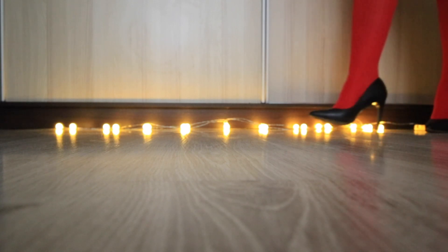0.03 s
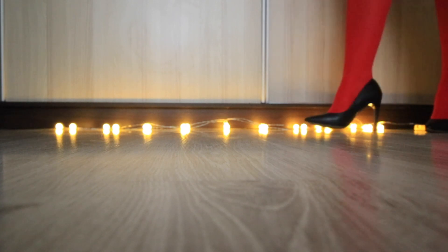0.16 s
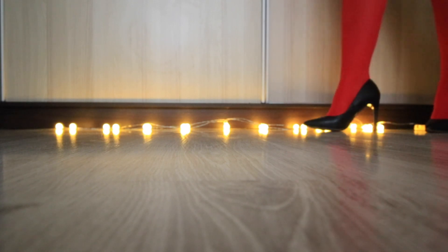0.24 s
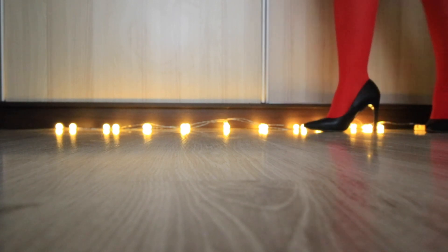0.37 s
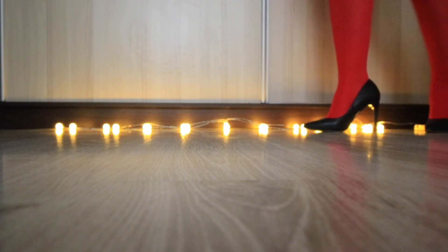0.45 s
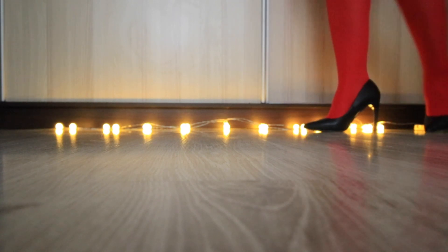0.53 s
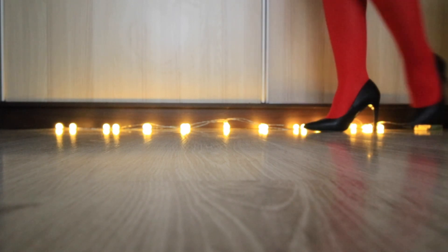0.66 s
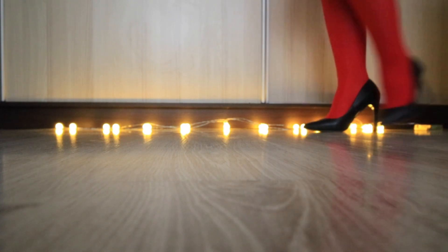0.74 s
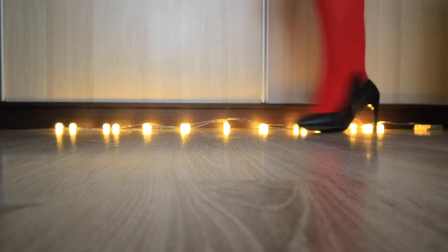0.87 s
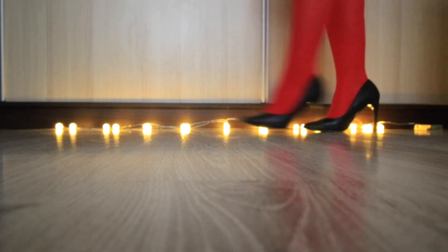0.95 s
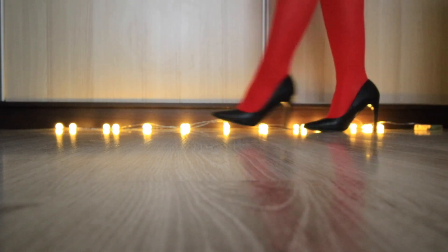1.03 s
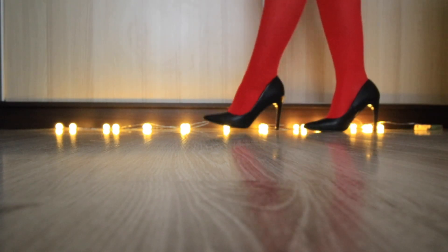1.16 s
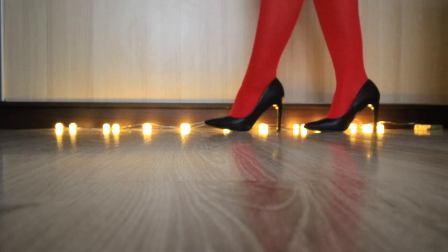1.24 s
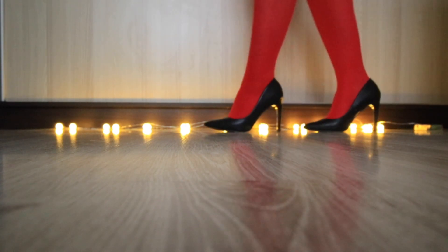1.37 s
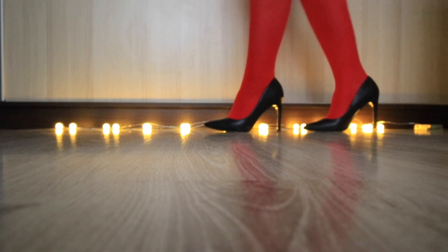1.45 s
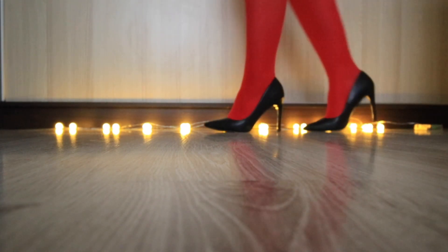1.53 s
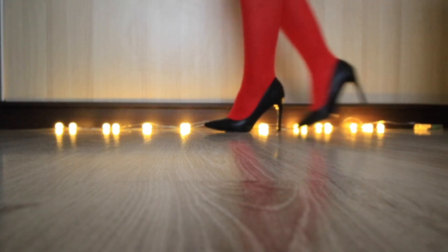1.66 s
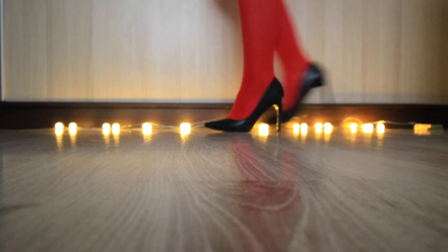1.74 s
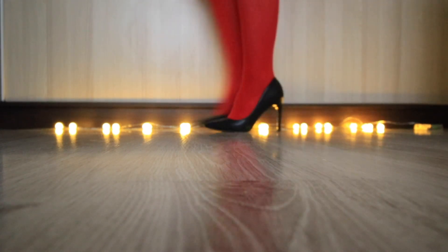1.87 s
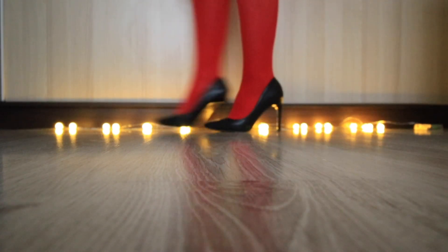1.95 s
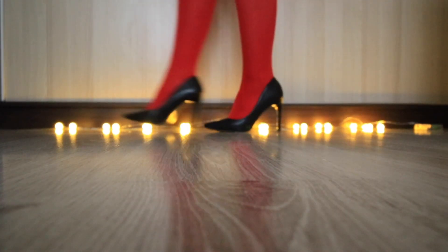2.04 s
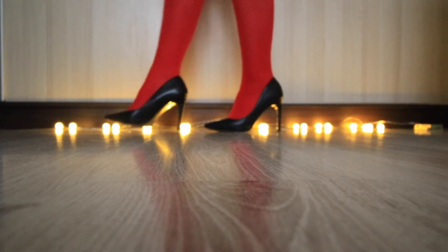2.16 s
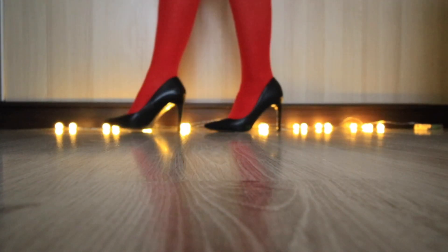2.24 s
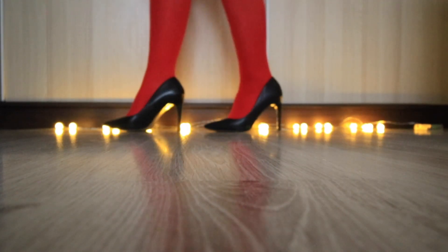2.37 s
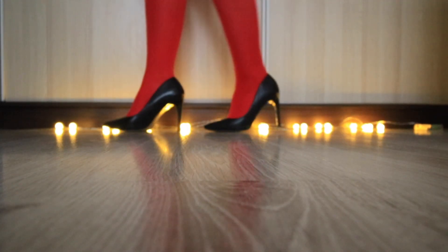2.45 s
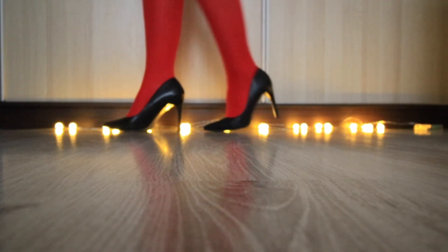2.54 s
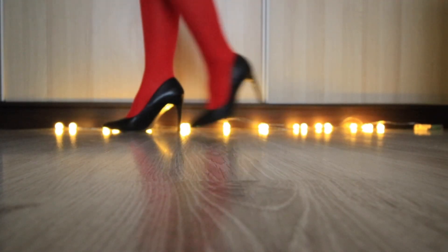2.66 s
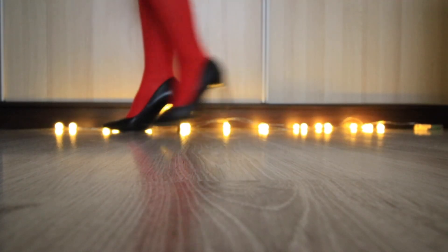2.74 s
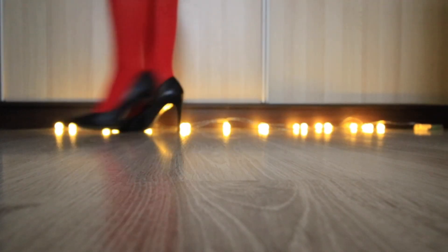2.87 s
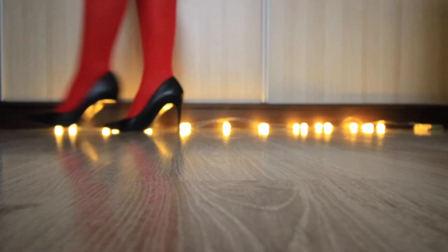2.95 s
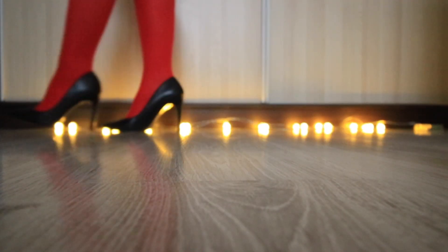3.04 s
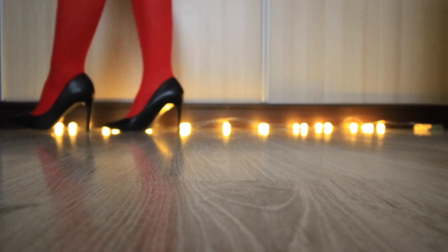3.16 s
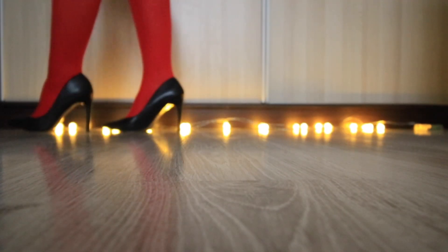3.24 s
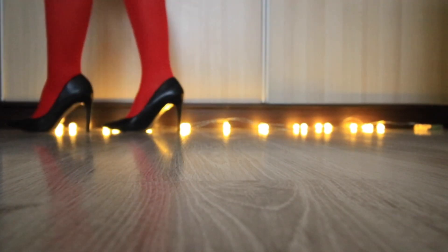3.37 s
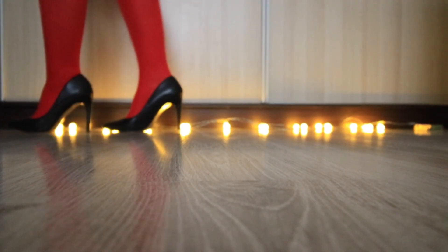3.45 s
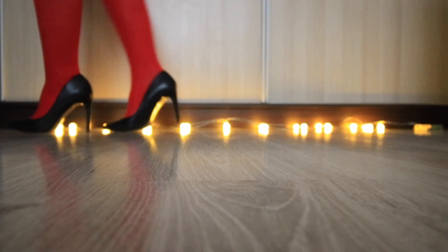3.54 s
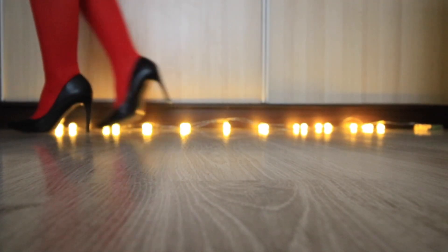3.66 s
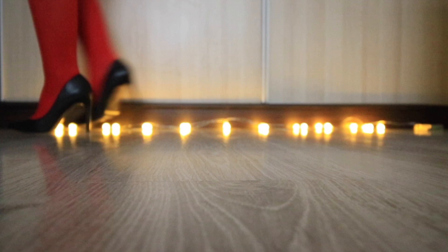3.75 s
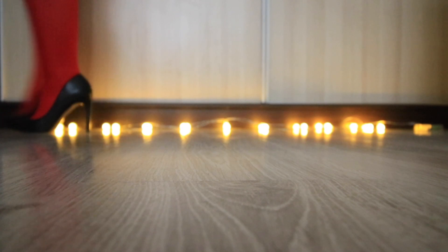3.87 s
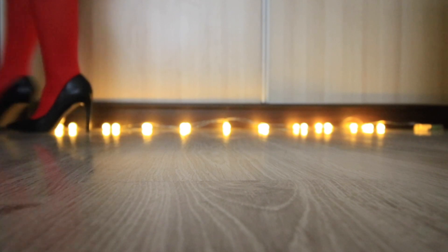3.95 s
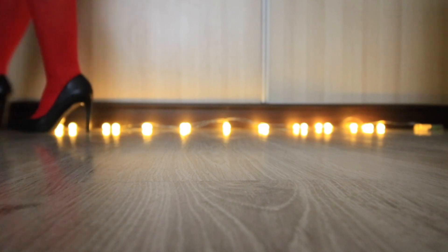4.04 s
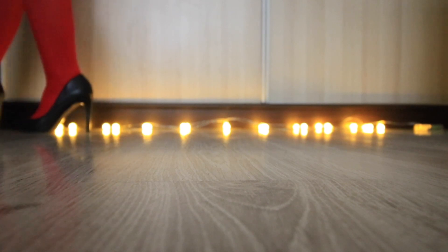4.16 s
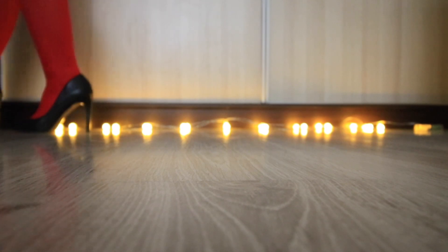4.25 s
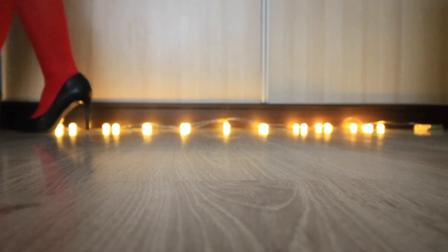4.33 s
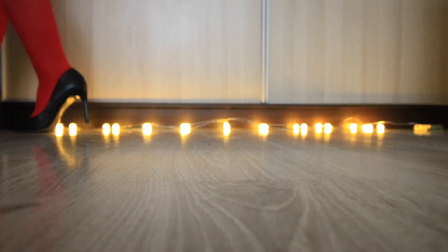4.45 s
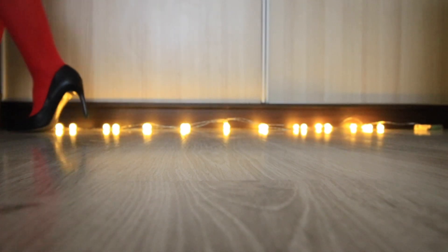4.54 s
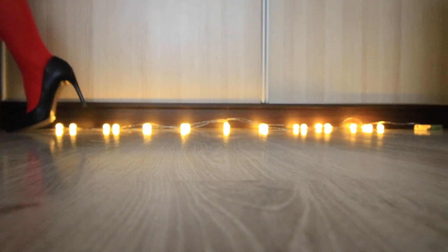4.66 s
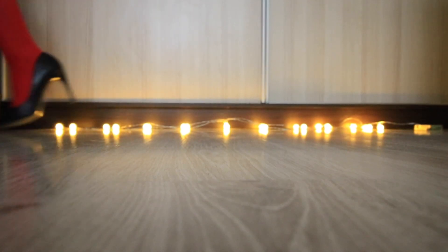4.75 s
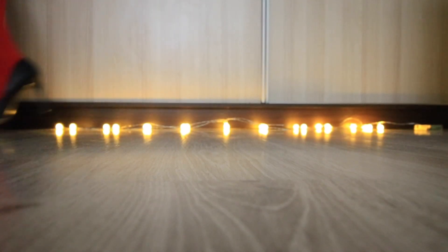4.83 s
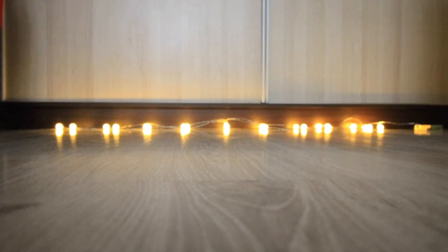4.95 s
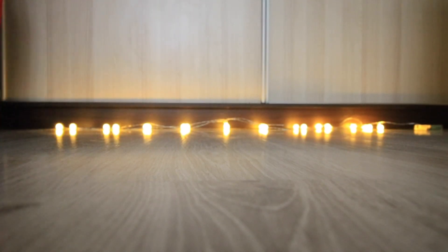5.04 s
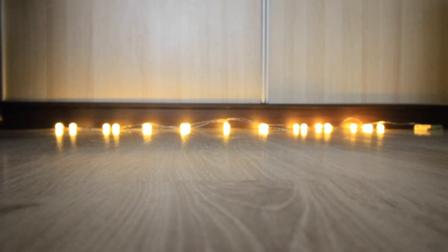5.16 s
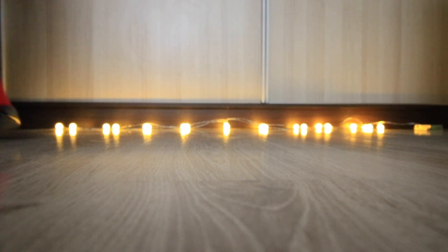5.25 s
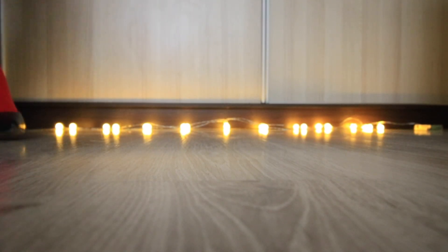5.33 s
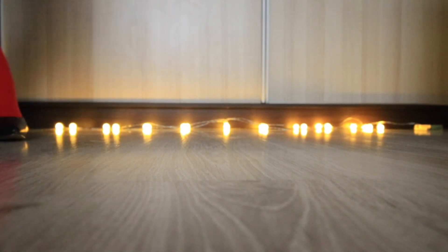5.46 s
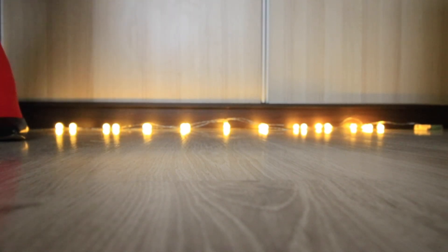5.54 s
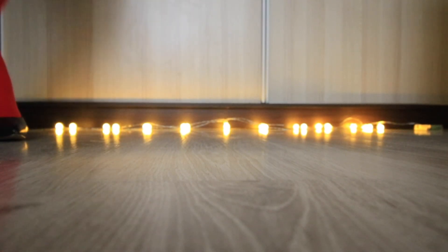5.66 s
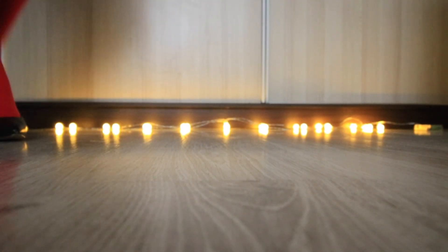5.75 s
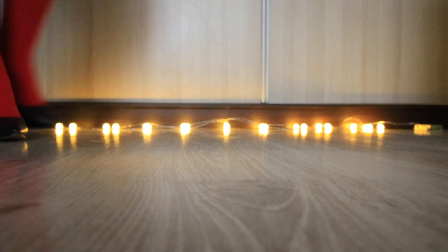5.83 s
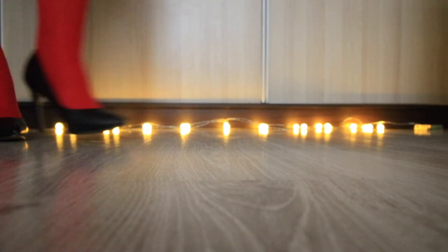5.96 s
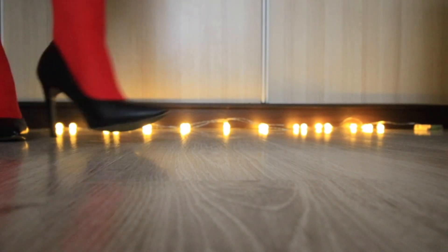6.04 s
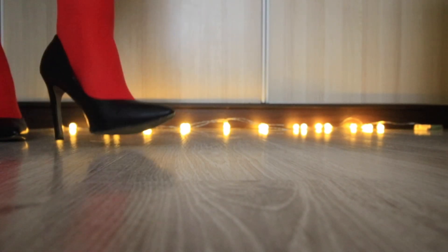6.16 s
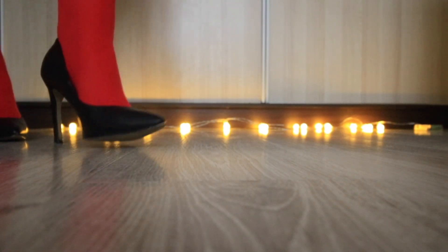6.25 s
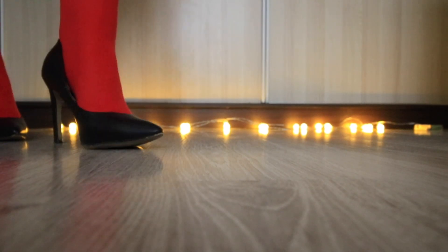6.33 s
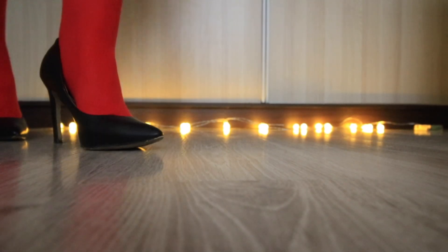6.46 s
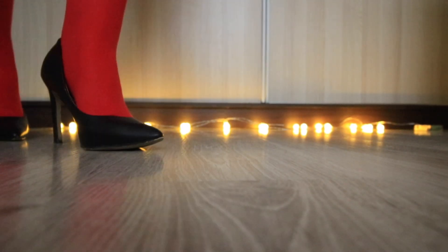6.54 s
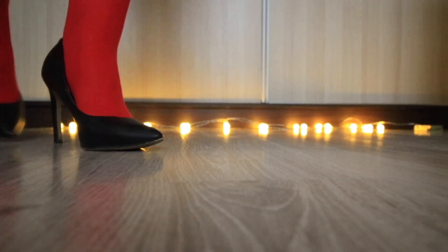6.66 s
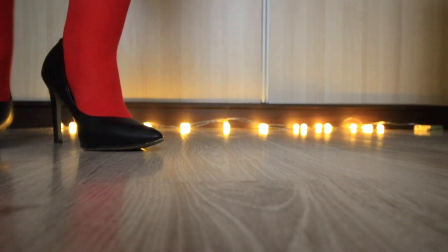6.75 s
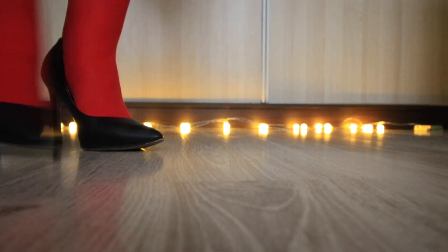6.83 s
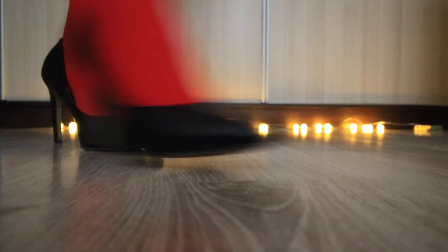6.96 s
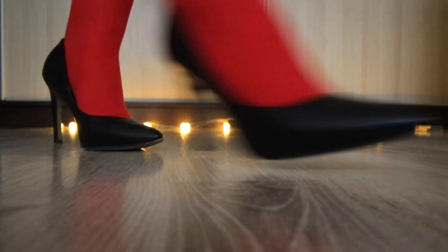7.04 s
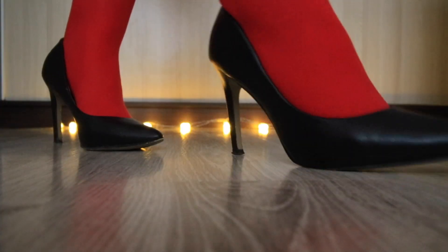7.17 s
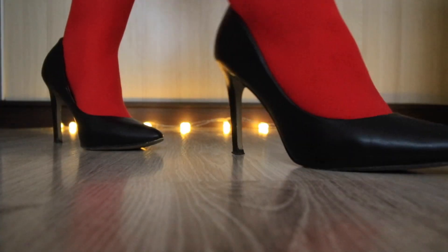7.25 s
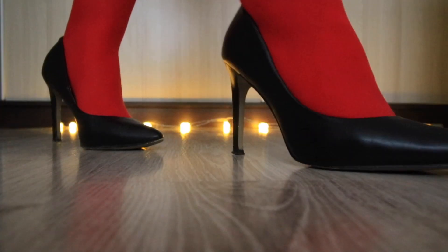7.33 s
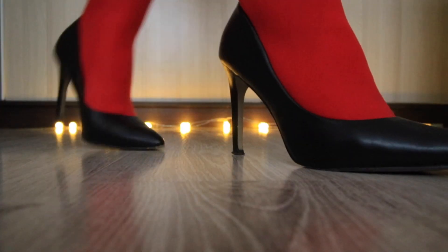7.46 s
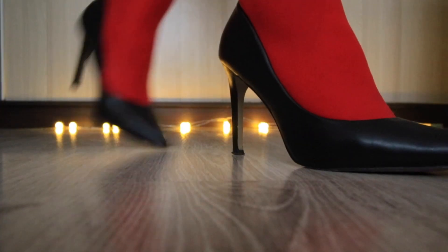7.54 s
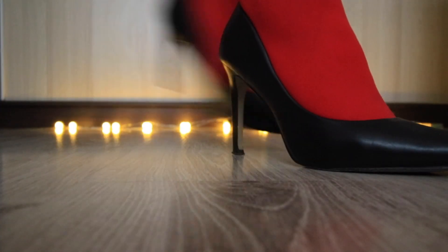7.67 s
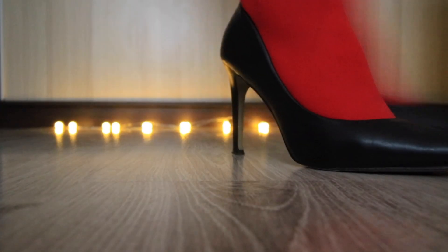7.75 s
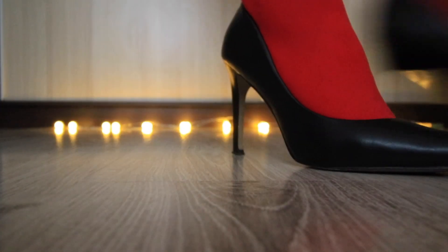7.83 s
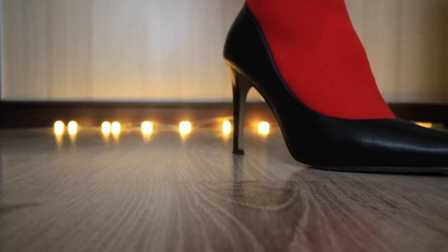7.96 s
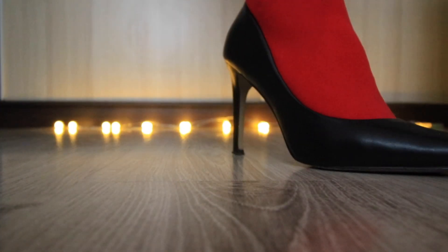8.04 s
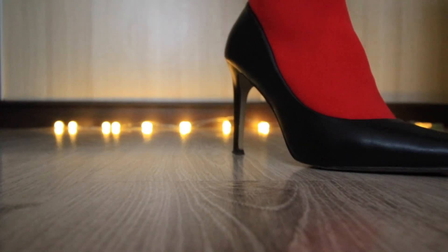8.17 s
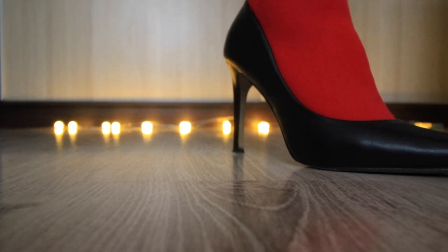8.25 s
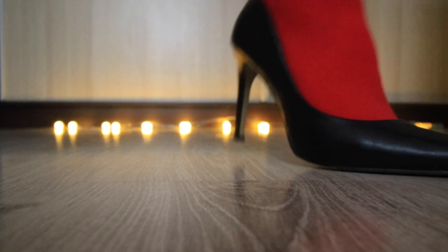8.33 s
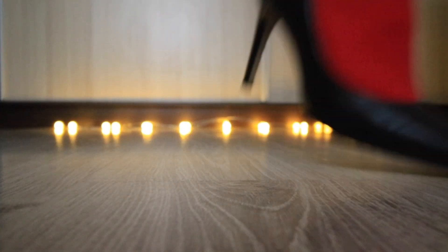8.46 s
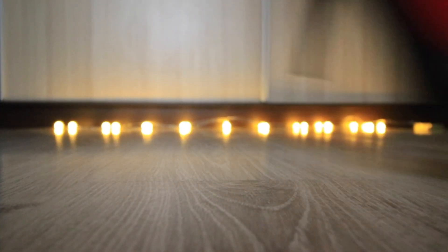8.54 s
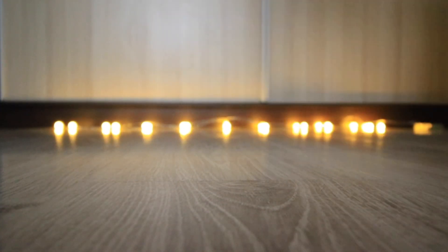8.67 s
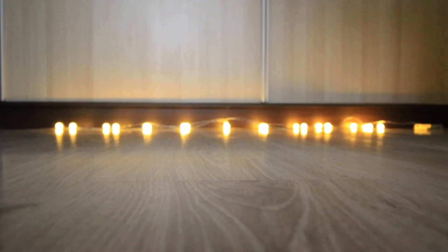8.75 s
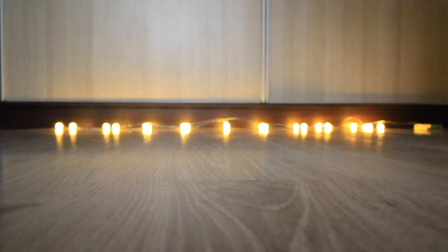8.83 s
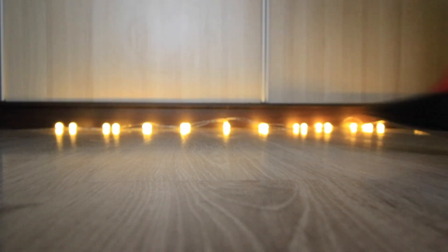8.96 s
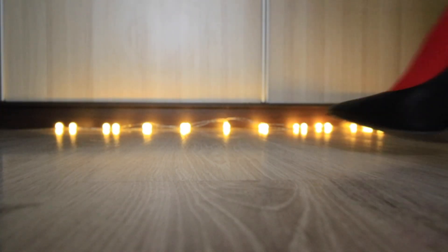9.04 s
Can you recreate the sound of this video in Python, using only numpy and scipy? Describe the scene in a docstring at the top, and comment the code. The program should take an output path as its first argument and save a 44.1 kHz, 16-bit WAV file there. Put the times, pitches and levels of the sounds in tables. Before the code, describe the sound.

Nine evenly spaced high-heel steps on a hard wooden-type floor, indoors. Each crisp heel strike has a short woody ring and thud, followed by a faint sole pat. Sharp clicks of shifting weight cluster around the middle, with airy stocking rustle as the legs pass. Short room echo surrounds early steps; the last three are nearer, fuller and more direct, over a low quiet room noise.

```python
"""Slow steps in stiletto heels on a laminate floor in a small room, ending close to the microphone.
Each heel knocks the boards (harder blows are brighter, nearer ones drier), the sole taps after it, and shoe and planks snap under the shifting weight.
Between steps the stockinged legs brush past each other, over a quiet room noise."""
import sys
import numpy as np
from scipy import signal
from scipy.fft import rfft, irfft, next_fast_len
from scipy.io import wavfile
from scipy.ndimage import uniform_filter1d, map_coordinates

SR = 44100
rng = np.random.default_rng(int(sys.argv[2]) if len(sys.argv) > 2 else 0)


def digitize_waveform(pressure):
    """Quantize a signal to 16-bit integers and store it at the path in sys.argv[1].

    Rows of a 2-D input are taken as channels; values are limited to [-1, 1].
    """
    field = np.atleast_2d(pressure).T
    bounded = np.clip(field, -1, 1)
    quanta = np.round(bounded * 32767).astype(np.int16)
    wavfile.write(sys.argv[1], SR, quanta)


N = 401310

# heel strikes: (s, knock dB, thud dB, brightness dB per octave, plank pitch Hz, plank t60 s, plank overtone Hz, joist boom dB)
HEELS = [(0.123, -25.5, -32, -3.5, 522, 0.042, 850, 19),
         (1.236, -30, -28.5, 5.5, 524, 0.016, 1730, 7),
         (2.209, -24, -27, 0.4, 494, 0.0063, 890, 17),
         (3.1699, -32, -33, 1, 350, 0.0093, 600, 17),
         (4.153, -22, -31.5, 0.15, 574, 0.02, 1360, -13),
         (5.2745, -23, -29, .5, 573, .01, 1250, -6),
         (6.2544, -20.5, -22.5, -0.3, 710, 0.012, 814, 19),
         (7.1281, -18, -24, -2, 299, 0.016, 1430, -19),
         (8.0425, -21, -28.5, -4.5, 376, 0.022, 620, -22)]
# sole taps: (s, knock dB, thud dB, brightness dB per octave, plank pitch Hz)
TAPS = [(0.269, -47, -51, -3, 560), (0.328, -49.5, -61, -0.5, 786), (1.409, -42.5, -50, 2, 940), (1.437, -44, -46, -7, 430),
        (2.293, -48.5, -45, 2.9, 960), (3.2579, -44, -45, 2.5, 950), (3.308, -42.5, -44, 3, 610),
        (3.43, -42, -59, -0.5, 915), (4.287, -35.5, -46, -7.5, 580), (5.3696, -39.5, -47, 3, 485),
        (5.4369, -28.5, -48, -1, 493), (6.341, -39, -37.5, 3.5, 1110), (6.424, -34.5, -51.5, -3.5, 580),
        (7.328, -32, -50, 3.5, 910), (7.989, -52.5, -70, -3, 596), (8.1644, -42, -45.5, 1.2, 1000), (8.2577, -35.5, -43, -3.5, 866)]
# snaps of shoe and planks: (s, strength dB over a usual snap, brightness dB per octave, crackle and echo dB)
SNAPS = [(0.2718, -3, 3, 6), (0.3808, 1, 6, 8.5), (1.4219, -3, 6.5, 22),
         (3.031, -26, 3.5, -1), (3.286, -17.5, 5, 13), (3.5954, 13.5, -1, 4), (3.624, 6.5, 0.8, 4.5), (3.9328, 15.5, 3.5, 3), (3.973, 3.5, -2, 8),
         (4.2593, 5.5, 0.2, 10), (4.277, 3.5, -0.8, 16), (4.297, -3, -1, -2),
         (4.3855, 2, .3, 6), (4.419, 1.5, 0.3, 8), (4.4636, -1, .8, 5), (4.501, -8.5, 0, 19),
         (5.002, -18, -1, 1), (5.461, 0.5, -2.5, 12), (6.2707, 2.5, -2, -1), (6.349, 3, -2.5, 3), (6.3683, 7, 2, 7),
         (7.19, -1, -0.5, 1.5), (7.2923, -12, 2, 6), (8.1593, -8, -4.5, 9), (8.202, -9, -0.5, 4)]
# edges of the thud, knock, clack, click and air registers (Hz)
REGISTERS = [100, 300, 1000, 2500, 6000, 14000]  # fixed
# modes of the floor: (Hz, width Hz, dB)
FLOOR = [(56.7, 15, 5), (431.3, 21, -1.5), (508, 98, 2), (614, 15, -0.5), (724, 23, -6)]
# contact spectra: (Hz, dB)
KNOCK = [(30, -25.5), (100, -9), (145, 6), (500, -2.5), (950, -1.5), (1700, -11.5), (2400, -12.5), (3200, -10.5), (3850, -12.5), (4600, -17.5), (6500, -21), (9000, -20.5), (16000, -41)]
SNAP = [(100, -43), (700, -25), (1600, -16.5), (2800, -6.5), (3700, -3.5), (4500, -2), (5500, -7), (6700, -3.5), (9500, -8.5), (16000, -31)]
# the room's answer: (Hz, t60 s) and (Hz, dB)
ROOM_T60 = [(100, 0.0944), (260, 0.3546), (700, 0.2755), (2000, 0.256), (5000, 0.25), (14000, 0.33)]
ROOM_COLOUR = [(60, 11.5), (180, 14), (500, 3), (1500, 6), (4000, -1), (9000, 7.5), (15000, 5)]
# steady spectra: (Hz, dB per Hz)
RUSTLE = [(100, -11), (250, 4.5), (600, 1), (1200, 0.5), (3000, 1), (4500, -3), (7000, -12), (12000, -29)]
SWISH = [(1500, -30), (4000, -13), (6500, -1.5), (9500, -0.5), (12500, -6), (16000, -18)]
RUMBLE = [(15, -14), (35, -1), (55, 2), (100, 0), (200, -5.5), (500, -21), (2000, -61), (16000, -120)]
QUIET = [(15, -68), (25, -20), (92, -7.5), (123, -5), (157, -4), (384, -10.5), (427, -10.5), (591, -7), (734, -14),
         (863, -11.5), (1160, -15.5), (1370, -13.5), (16000, -31)]
QUIET_DB = -60  # the room's own noise
TOP_HZ = 16200  # fixed
SPAN = 16384  # fixed
# the walker passes along the wall, turns and comes close to the microphone: (s, distance m)
PATH = [(0, 0.92), (2.5, 1.12), (5.3, 0.97), (6.3, 0.8), (7.2, 0.44), (8.2, 0.51)]
ECHO_DB, TRAVEL_S_PER_M = 4.0, 0.00132  # room over direct sound at 1 m; delay of the floor's bending wave at 1 kHz
# a usual blow's clack, click and air registers (dB over its knock)
HEEL_TREBLE_DB, SOLE_TREBLE_DB = [-14.5, -18, -37], [-8, -13.5, -27]
USUAL_PLANK_HZ, CLACK_DB_PER_OCTAVE = 750, 5.5  # a higher-pitched plank clacks more under the sole
# a usual snap's knock, clack, click and air registers (dB), and their growth with strength (dB per dB): hard snaps are mostly click
SNAP_DB, SNAP_GROWTH = [-57.5, -50.5, -42, -49.5], [0.078, 0.36, 1, 0.7]
# one leg brushes the other: (s at the fastest, swish dB, rustle dB, rise s, fall s); rise and fall span 10 dB of swish
BRUSHES = [(0.66, -59.5, -59.5, .25, 0.2), (0.91, -62, -61, 0.092, 0.1), (1.62, -53.5, -55, 0.082, 0.17),
           (2.65, -48.5, -51.5, 0.082, 0.12), (3.65, -53, -54.5, 0.14, 0.15), (4.72, -58, -58, 0.16, 0.16),
           (5.69, -50.5, -51.5, 0.097, 0.2), (6.64, -43, -50.5, 0.079, 0.091), (6.95, -61.5, -59, 0.078, .12),
           (7.58, -54.5, -53, .14, 0.18), (8.49, -50, -55, 0.1, 0.12), (8.739, -63, -62, 0.25, 0.14)]
BRUSH_ROUND, RUSTLE_SPAN = 0.12, 0.99  # roundness of a brush's top; the rustle's rise and fall as a multiple of the swish's
IDLE_SWISH_DB, IDLE_RUSTLE_DB = -67, -67  # the cloth never quite rests
# the floor rumbles as the weight settles after a heel strike, and as the other foot pushes off (levels at 1 m)
SETTLE_DB, SETTLE_DELAY_S, SETTLE_RISE_S, SETTLE_FALL_S = -55.5, 0.062, 0.091, 0.19
PUSH_DB, PUSH_S = -8.5, 0.089  # level over the rustle of the passing leg; time to fade by 10 dB
GLANCE_S, GLANCE_POWER, GLANCE_SHARE = 0.00028, 0.49, 0.067  # the swish glances off the floor: delay and share at 1 m; both grow as the walker nears
RUMBLE_WANDER_DB = 3.0  # fixed
# a heel tip skims the floor just before landing and sets its stem singing: (s, dB, rise s, fall s)
SKIMS = [(8.005, -55.5, 0.0088, 0.069)]
SKIM = [(2500, -40), (3600, -4), (4050, 0), (4500, -5), (6000, -35), (16000, -80)]  # (Hz, dB per Hz)
WEAVE_PATCHY_DB = 1.0  # fixed


def amp(db):
    """Decibels to gain."""
    return 10 ** (np.asarray(db) / 20)


def unit(x):
    """x at rms 1."""
    return x / np.sqrt(np.mean(x ** 2) + 1e-20)


def along(points, hz):
    """(Hz, value) points read on a log axis."""
    f, v = np.transpose(points)
    return np.interp(np.log(hz + 1), np.log(f + 1), v)


def wobble(rate):
    """A smooth random curve, rate knots a second."""
    return map_coordinates(rng.standard_normal(int(N * rate / SR) + 4), [np.arange(N) * rate / SR])


def filtered(x, response):
    """x times a response of frequency."""
    m = next_fast_len(N + SPAN)
    return irfft(rfft(x, m) * response(np.fft.rfftfreq(m, 1 / SR)), m)[:N]


def noise(spectrum, patchy_db):
    """Coloured noise of rms 1, with patches of random gain in time and frequency."""
    z = signal.stft(rng.standard_normal(N), nperseg=512)[2]
    field = uniform_filter1d(uniform_filter1d(rng.standard_normal(z.shape), size=16, axis=0), size=14, axis=1)
    patchy = signal.istft(z * amp(patchy_db * unit(field)), nperseg=512)[1][:N]
    return unit(filtered(patchy, lambda hz: amp(along(spectrum, hz))))


def causal(points):
    """Minimum-phase response through (Hz, dB) points."""
    cepstrum = irfft(np.log(amp(along(points, np.fft.rfftfreq(SPAN, 1 / SR)))))
    cepstrum[1:SPAN // 2] *= 2
    cepstrum[SPAN // 2 + 1:] = 0
    return np.exp(rfft(cepstrum))


def resonance(hz, centre, width):
    """Response of one damped mode, 1 at its centre."""
    return 1j * hz * width / (centre ** 2 - hz ** 2 + 1j * hz * width)


def room(early_db, early_t60, gap):
    """A fresh room response of energy 1: strong early echoes off wall and floor, then a tail."""
    hz, t, z = signal.stft(rng.standard_normal(SPAN), SR, nperseg=256)
    decay = amp(along(ROOM_COLOUR, hz)[:, None] - 60 * t / along(ROOM_T60, hz)[:, None])
    tail = signal.istft(z * decay, SR, nperseg=256)[1][:SPAN]
    t = np.arange(SPAN) / SR
    tail *= (1 + amp(early_db - 60 * t / early_t60)) * (1 - np.exp(-(t / gap) ** 2))
    return rfft(tail) / np.linalg.norm(tail)


def voiced(blow, levels):
    """A blow's waveform, with its first 25 ms at the given levels in the uppermost registers."""
    size = int(.025 * SR)  # fixed
    fade = np.sin(np.minimum(1, 2 - 2 * np.arange(size) / size) * np.pi / 2) ** 2
    edges = np.array(REGISTERS[-len(levels) - 1:])
    for _ in range(2):
        power = np.cumsum(abs(rfft(irfft(blow)[:size] * fade, SPAN)) ** 2) * 2 / (SPAN * size)
        have = 10 * np.log10(np.diff(power[edges * SPAN // SR]) + 1e-20)
        blow = blow * causal(np.c_[np.sqrt(edges[1:] * edges[:-1]), levels - have])
    return irfft(blow)


def add(track, s, sound):
    """Mix a sound into the track at s seconds."""
    part = track[round(s * SR):][:len(sound)]
    part += sound[:len(part)]


def boards(hz, travel):
    """The struck floor: its modes, and bending waves whose treble arrives first (travel: s at 1 kHz)."""
    modes = 1 + sum(amp(db) * resonance(hz, centre, width) for centre, width, db in FLOOR)
    lag = 2 * np.sqrt(1000 * hz) - hz * np.sqrt(1000 / TOP_HZ)  # fixed
    return causal(KNOCK) * modes * np.exp(-2j * np.pi * travel * lag)


def heels():
    """Each heel tip drives the plank under it, which rings briefly at that spot's pitches and shakes the joists."""
    track, hz = np.zeros(N), np.fft.rfftfreq(SPAN, 1 / SR)
    stem = 1 + amp(4) * resonance(hz, 3590, 450)  # the thin heel rings briefly
    joists = resonance(hz, 198.0, 18) + amp(-16) * resonance(hz, 165.0, 30)
    joists = joists * np.exp(-2j * np.pi * hz * 0.00519)  # the heavy frame answers late
    for s, knock_db, thud_db, brightness, pitch_hz, t60, overtone_hz, boom_db in HEELS:
        levels = blow_levels(knock_db, thud_db, brightness, HEEL_TREBLE_DB)
        plank = 1 + amp(14) * resonance(hz, pitch_hz, np.log(1000) / (np.pi * t60))
        plank += amp(8.0) * resonance(hz, overtone_hz, 120)
        direct = stem * plank + amp(boom_db + 2.5) * joists
        # the whole floor feeds the room, so the echoes carry less of this spot's colour
        echoes = amp(echo_db(s) + 4.5) * np.sqrt(plank) * room(early_db=6.0, early_t60=0.03, gap=0.001)
        add(track, s, voiced(boards(hz, TRAVEL_S_PER_M * distance(s)) * (direct + echoes), levels))
    return track


def taps():
    """The sole comes down after the heel, a lighter blow on the same boards."""
    track, hz = np.zeros(N), np.fft.rfftfreq(SPAN, 1 / SR)
    sole = 1 + amp(0) * resonance(hz, 2440, 1400)  # the hard outsole clacks
    floor = boards(hz, travel=0.001177) * sole
    for s, knock_db, thud_db, brightness, pitch_hz in TAPS:
        clack_db = CLACK_DB_PER_OCTAVE * np.log2(pitch_hz / USUAL_PLANK_HZ)
        levels = blow_levels(knock_db, thud_db, brightness, SOLE_TREBLE_DB + np.r_[clack_db, 0, 0])
        plank = 1 + amp(2) * resonance(hz, pitch_hz, 240)
        space = 1 + amp(echo_db(s) + 0.5) * room(early_db=4.5, early_t60=0.064, gap=0.0014)
        add(track, s, voiced(floor * plank * space, levels))
    return track


def snaps():
    """A stuck joint gives way: a sharp snap inside a short crackle."""
    track, t = np.zeros(N), np.arange(SPAN) / SR
    hz = np.fft.rfftfreq(SPAN, 1 / SR)
    lead = .0011  # fixed
    colour = causal(SNAP) * np.exp(-2j * np.pi * 0.00063 * np.sqrt(1000 * hz))  # the plank spreads the click a little
    release = np.exp(-2j * np.pi * hz * lead)
    for s, strength_db, brightness, room_db in SNAPS:
        slope_db = tilt(brightness, count=3)
        levels = SNAP_DB + strength_db * np.array(SNAP_GROWTH) + np.r_[0, slope_db - slope_db.mean()]
        crackle = rng.standard_normal(SPAN) * (1 - np.exp(-t / 0.0018)) * amp(-60 * t / 0.014)
        grit = amp(-5.5 + 0.91 * room_db) * rfft(crackle) / np.linalg.norm(crackle)
        stem = 1 + amp(strength_db - 9) * resonance(hz, 3900, 430)  # hard snaps set the heel stem ringing
        slip = 0.38 * np.exp(-2j * np.pi * hz * rng.uniform(0.00042, 0.001145))  # a second slip colours each snap differently
        echoes = amp(room_db + 0.5) * np.sqrt(stem) * room(early_db=-3.5, early_t60=0.074, gap=0.00056)
        snap = release * (stem * (1 + slip) + echoes) + grit
        add(track, s - lead, voiced(colour * snap, levels))
    return track


def legs():
    """Stockings rub as one leg passes the other, swelling and fading with its speed."""
    rub = amp(0.82 * wobble(35) + 0.53 * wobble(300))  # the weave catches and lets go
    swish = swells([(s, db, rise, fall) for s, db, _, rise, fall in BRUSHES], IDLE_SWISH_DB)
    rustle = swells([(s, db, RUSTLE_SPAN * rise, RUSTLE_SPAN * fall) for s, _, db, rise, fall in BRUSHES], IDLE_RUSTLE_DB)
    cloth = rub * (amp(1.66) * rustle * noise(RUSTLE, WEAVE_PATCHY_DB) + amp(1.3) * swish * noise(SWISH, WEAVE_PATCHY_DB))
    n = np.arange(N)
    near = 1 / distance(n / SR)
    return cloth + GLANCE_SHARE * near * np.interp(n - GLANCE_S * SR * near ** GLANCE_POWER, n, cloth)  # the reflection combs the hiss


def curves(rows):
    """One value per sample for each column after the time."""
    s, *columns = np.transpose(rows)
    return [np.interp(np.arange(N) / SR, s, c) for c in columns]


def distance(s):
    """Metres from the shoes to the microphone."""
    return np.maximum(np.interp(s, *np.transpose(PATH)), .1)  # fixed


def echo_db(s):
    """The room's share grows with the distance."""
    return ECHO_DB + 20 * np.log10(distance(s))


def tilt(brightness, count):
    """dB added to the top count registers, the lowest of them unchanged: a harder contact is brighter."""
    edges = np.array(REGISTERS[-count - 1:])
    octaves = np.log2(edges[1:] * edges[:-1]) / 2
    return brightness * (octaves - octaves[0])


def blow_levels(knock_db, thud_db, brightness, treble_db):
    """The five register levels of a blow: weight sets the thud, force and hardness the rest."""
    return np.r_[thud_db, knock_db + np.r_[0, treble_db] + tilt(brightness, count=4)]


def swells(rows, idle_db):
    """Gain per sample of rounded swells (s, dB, rise s, fall s) over an idle level; their powers add."""
    t = np.linspace(0, N / SR, 2000)  # fixed
    power = amp(idle_db) ** 2
    for s, db, rise, fall in rows:
        away = (t - s) / np.where(t < s, rise, fall)
        power = power + amp(db - 10 * (np.hypot(away, BRUSH_ROUND) - BRUSH_ROUND)) ** 2
    return np.interp(np.arange(N) / SR, t, np.sqrt(power))


def weight():
    """The floor rumbles under the shifting weight, louder as the walker nears."""
    settling = [(s + SETTLE_DELAY_S, SETTLE_DB, SETTLE_RISE_S, SETTLE_FALL_S) for s, *_ in HEELS]
    pushing = [(s, rustle_db + PUSH_DB, PUSH_S, PUSH_S) for s, _, rustle_db, *_ in BRUSHES]
    load = swells(settling + pushing, idle_db=-91) / distance(np.arange(N) / SR)
    return load * amp(RUMBLE_WANDER_DB * wobble(12)) * noise(RUMBLE, patchy_db=2)


def skims():
    """The skimming heel tip rubs a narrow band of noise out of the stem."""
    return swells(SKIMS, idle_db=-120) * noise(SKIM, patchy_db=1.5)


def scene():
    """Steps and legs over the quiet of the room."""
    quiet = amp(QUIET_DB) * noise(QUIET, patchy_db=0)  # fixed
    return (heels() + taps() + snaps() + legs() + weight() + skims() + quiet)[None]


def record(dry):
    """The camera keeps nothing above its band limit."""
    return filtered(dry[0], lambda hz: hz < TOP_HZ)[None]


dry = scene()
out = record(dry)
digitize_waveform(out)
```